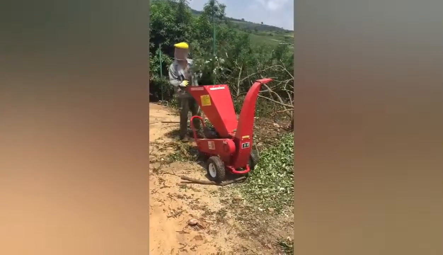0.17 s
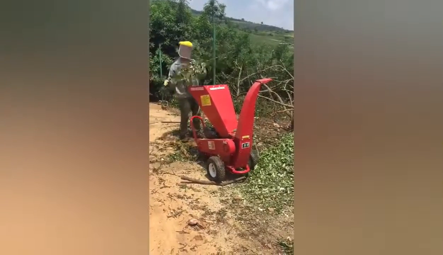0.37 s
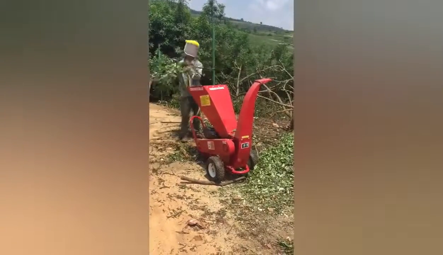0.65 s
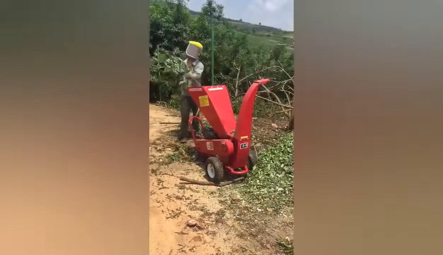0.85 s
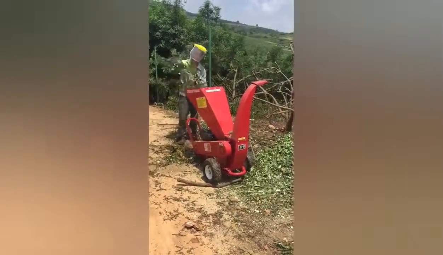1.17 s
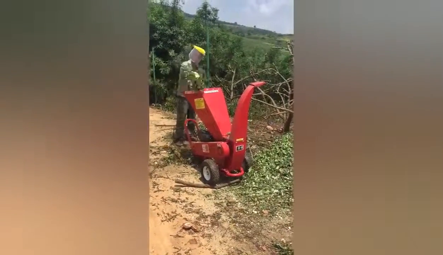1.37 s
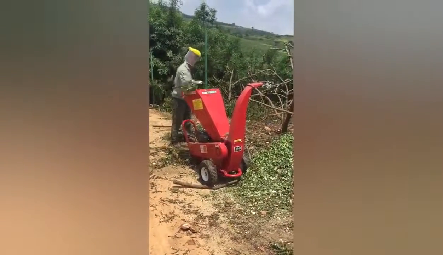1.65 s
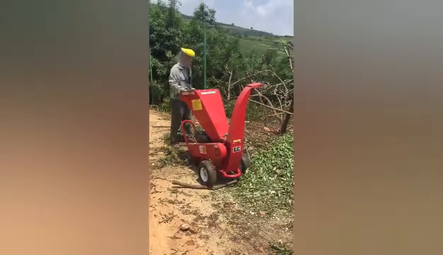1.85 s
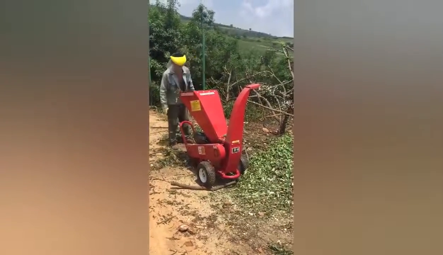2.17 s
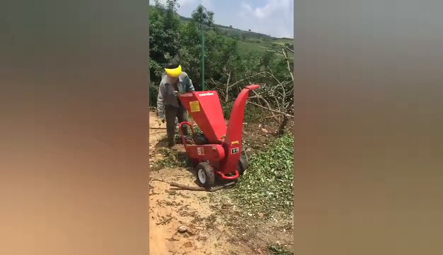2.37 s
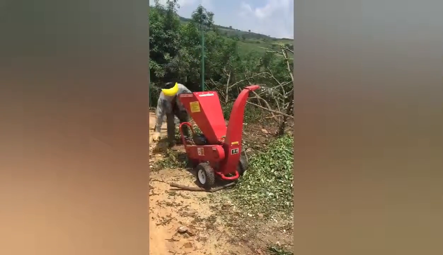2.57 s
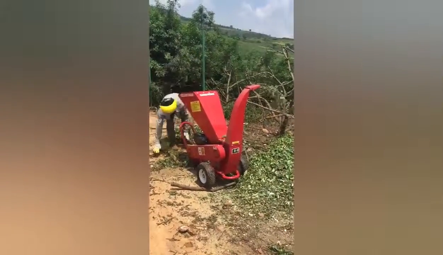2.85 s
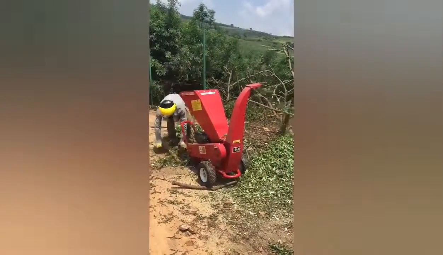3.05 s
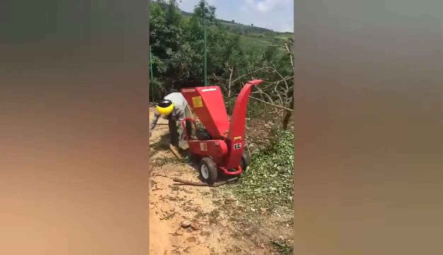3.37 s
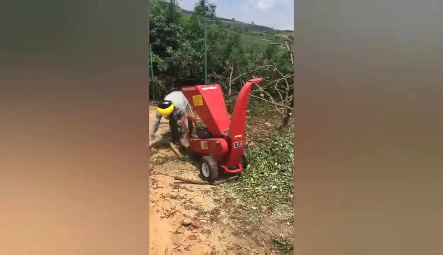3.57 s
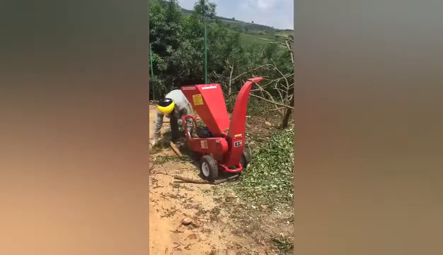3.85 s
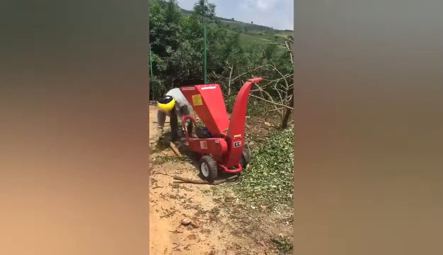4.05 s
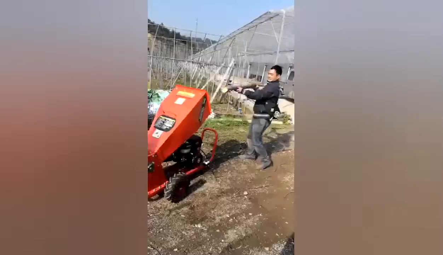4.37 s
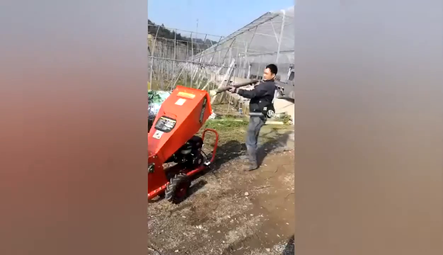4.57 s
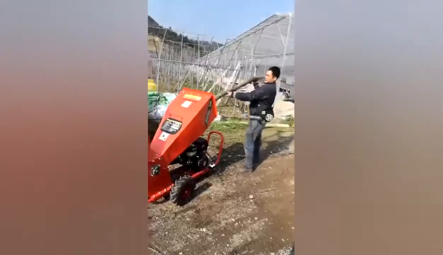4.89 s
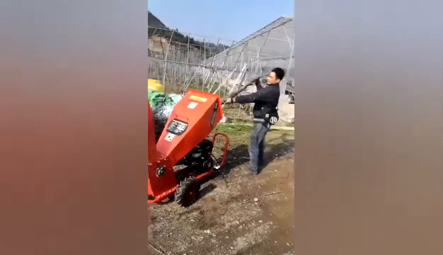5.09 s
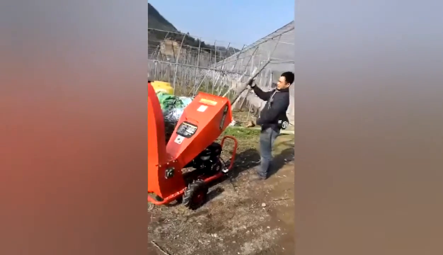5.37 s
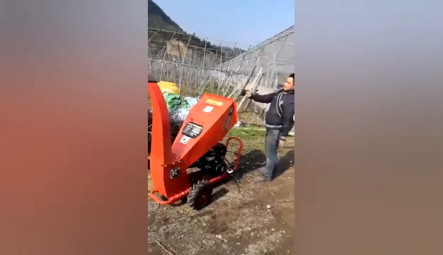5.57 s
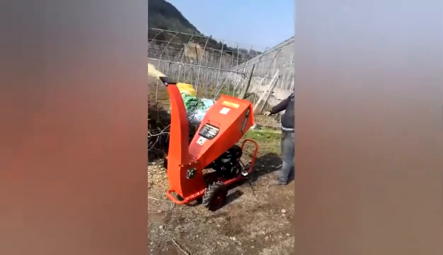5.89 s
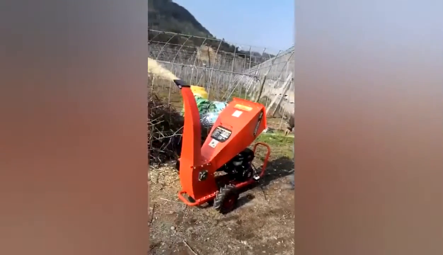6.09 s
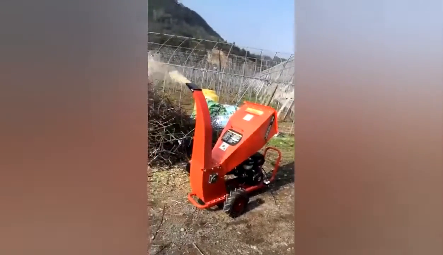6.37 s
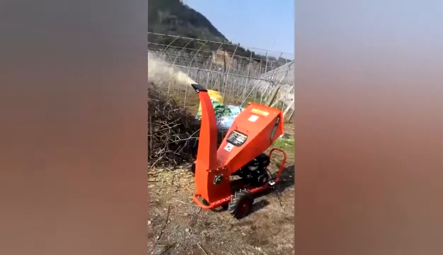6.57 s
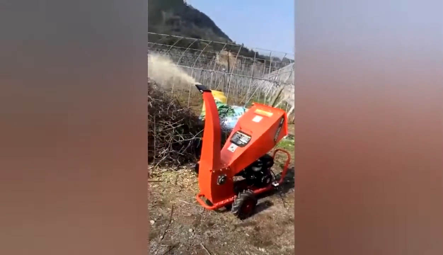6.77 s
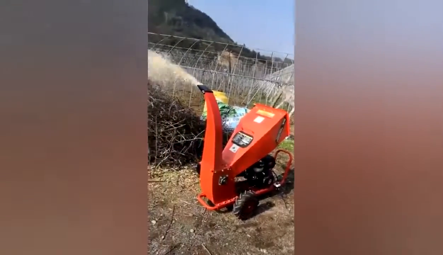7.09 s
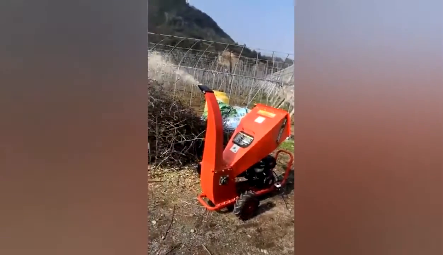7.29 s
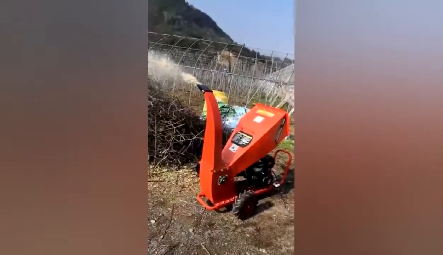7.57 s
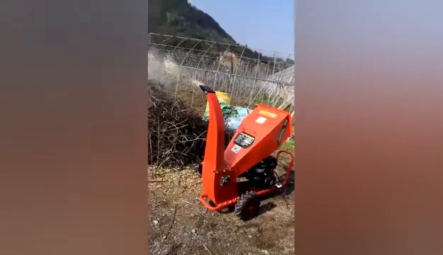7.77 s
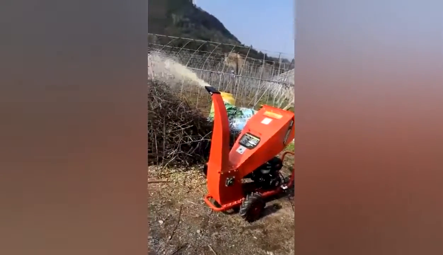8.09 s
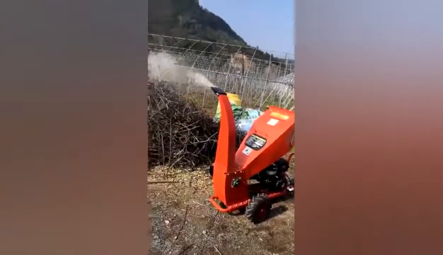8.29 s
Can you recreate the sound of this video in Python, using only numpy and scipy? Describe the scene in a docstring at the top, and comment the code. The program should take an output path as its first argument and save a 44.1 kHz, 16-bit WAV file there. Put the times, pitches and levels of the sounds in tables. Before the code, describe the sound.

Outdoors, a small engine-driven chipper drones quietly at a distance with a loose metal tick and faint leaf rustles. A leafy branch goes in with a crunchy hiss, snaps and a hopper knock, and the engine sags, then recovers. After a brief near-silent gap, a second chipper starts abruptly, close and much louder, clattering steadily before a thick pole makes it drop in pitch, hammer, groan and crack while chips pelt the steel chute.

```python
"""A far wood chipper drones and ticks while a leafy branch hisses through it; after near silence a second,
close and loud, growls and drops in pitch as a thick pole is hammered, groans and cracks into chips.
Engines are wavering multiples of the firing rate, with rattle noise coloured by housings and steel sheets.
Leaves, splinters and chips are showers of tiny impacts, shaped by the feed, the knife strokes and the chute.
Knocks, ticks and hopper blows are impulses or noise bursts through resonances; groans are gliding tones."""
import sys
import numpy as np
from scipy import signal
from scipy.fft import rfft, irfft, next_fast_len
from scipy.io import wavfile
from scipy.ndimage import uniform_filter1d, map_coordinates

SR = 44100
rng = np.random.default_rng(int(sys.argv[2]) if len(sys.argv) > 2 else 0)


def log_audio(samples):
    """Write samples as a 16-bit WAV file to the path given in sys.argv[1]."""
    # one column per channel
    frames = np.atleast_2d(samples).T
    # limit to full scale, then quantise
    limited = np.clip(frames, -1, 1)
    pcm = np.round(limited * 32767).astype(np.int16)
    wavfile.write(sys.argv[1], SR, pcm)


N = 372204
T = np.arange(N) / SR   # seconds

FIRST_STOP_S, SECOND_START_S = 4.341, 4.6465
CUTOFF_HZ = 16000

# Near engine speed. Each row: time in seconds, firings per second.
NEAR_SPEED = [(4.65, 30.05), (5.76, 30.15), (6.0, 26.7), (6.13, 25.4), (6.6, 26.0), (6.87, 26.4),
              (7.12, 25.8), (7.35, 26.2), (7.6, 27.0), (7.85, 28.0), (8.1, 28.4), (8.44, 29.4)]
# Load on the near knives; the first value also holds before the first row. Each row: time in seconds, load 0-1.
NEAR_LOAD = [(5.74, 0.4), (5.84, 0.55), (6.15, 0.6), (7.2, 0.76), (7.8, 0.58), (8.44, 0.81)]
# Near exhaust at zero load. Each row: multiple of the firing rate, relative level in dB.
NEAR_ORDERS = [(2, -18), (3, -5.5), (4, 0.5), (5, 0), (6, -1), (7, -3.5), (8, -1.5), (9, -12), (10, -21),
               (11, -18), (13, -15.5), (20, -43), (26, -33), (30, -16), (34, -6), (38, -17)]
# Near exhaust, throttle wide open. Each row: multiple of the firing rate, relative level in dB.
NEAR_LABOURING_ORDERS = [(2, -21.5), (3, -32), (4, -10), (5, -11.5), (6, -2.5), (7, -2), (8, -6), (9, -1),
                         (10, -2.5)]
NEAR_EXHAUST_DB, NEAR_EXHAUST_LOAD_DB = -24, -7   # at zero load; change at full load
# Rotor whine at zero load. Each row: multiple of the knife rate, level in dB.
ROTOR_ORDERS = [(1, -34.5), (2, -28.5), (4, -30.5), (5, -34.5)]
KNIVES_PER_FIRING = 3.393
# Knife growl. Each row: multiple of the knife rate, relative level in dB.
GROWL_ORDERS = [(3, -4), (4, -4), (5, -12), (6, -19)]
# growl before the load scales it; added by a full bite; change per firing per s lost
GROWL_DB, GROWL_BITE_DB, GROWL_SAG_DB = -23.5, 12, -0.7
# Near engine block and housing. Each row: frequency in Hz, relative level in dB per Hz.
NEAR_RUMBLE = [(25, -29), (60, -20), (110, -2), (200, -8), (310, -7.5), (400, -5.5), (520, -15.5),
               (800, -16.5)]
# Low rumble over time. Each row: time in seconds, level in dB.
NEAR_RUMBLE_LEVEL = [(4.65, -24), (5.2, -31.5), (5.8, -32), (6.3, -36.5), (6.6, -22), (7.3, -21.5),
                     (7.95, -25.5), (8.44, -25.5)]

# The knives bite deep into the pole. Each row: start in seconds, length in seconds, depth 0-1, splintering 0-1.
BITES = [(5.804, 0.1, 0.54, 0.66), (5.997, 0.046, 0.6, 0.4), (6.036, 0.094, 0.55, 0.5),
         (6.142, 0.11, 0.83, 0.36), (6.386, 0.027, 1, 0.7), (6.575, 0.034, 0.5, 0), (6.66, 0.031, 0.6, 0.4),
         (6.796, 0.069, 0.49, 0.6), (6.877, 0.11, 0.4, 0.32), (7.131, 0.054, 0.64, 0.15),
         (7.286, 0.028, 0.78, 0.57), (7.369, 0.023, 0.79, 0.2), (7.472, 0.035, 0.96, 0.15),
         (7.522, 0.052, 1, 0.99), (7.628, 0.03, 0.63, 0.96), (7.74, 0.038, 0.9, 1.0),
         (7.801, 0.04, 0.2, 0.64), (7.877, 0.18, 0.3, 0.47), (8.02, 0.062, 0.43, 0.8),
         (8.219, 0.045, 0.69, 0.32), (8.109, 0.039, 0.12, 0.2), (8.348, 0.028, 0.59, 0.68),
         (8.407, 0.033, 0.39, 0.98)]
BITE_ATTACK_S, BITE_RELEASE_S = 0.02, 0.022
# Hopper resonances. Each row: frequency in Hz, width in Hz, relative level in dB.
HOPPER = [(129.5, 20, -14), (229, 5, 7), (263, 7.6, 1), (310, 28, 6), (384, 18.5, 4.5), (410.6, 11.5, 8.5),
          (452.3, 12, 2.5), (514, 15, 2)]
HAMMER_DB, HAMMER_BITE_DB = -22, 3   # before the load scales it; added by a full bite
BOUNCES_PER_S, BOUNCE_DB = 16, 1   # small random bounces of the pole; spread at full load
# Near clatter. Each row: frequency in Hz, relative level in dB per Hz.
NEAR_CLATTER = [(350, -18), (600, -10.5), (800, 0.5), (1300, 1.5), (1650, 3), (1950, 4.5), (2320, -0.5),
                (2720, 2.5), (3000, -4), (3700, -7), (4400, -15.5), (6000, -16), (8000, -76)]
NEAR_CLATTER_DB, NEAR_CLATTER_BITE_DB = -18.5, 1.25   # between bites; added by full splintering
# Ringing steel sheets. Each row: frequency in Hz, width in Hz, relative level in dB.
NEAR_PANELS = [(769.6, 7.1, 10.5), (1159, 5.8, 9), (1543, 2, -7), (1995, 12, 3.5), (2415, 14, 9),
               (2607, 39, 2), (2702, 55, 2)]
PANEL_RING_DB, PANEL_LOAD_DB = -0.5, -2.5   # at zero load; the wood damps the ring at full load
SHEET_FLEX_S = 0.00018   # the load flexes the sheets, so their ring wavers in pitch
# Chips against the chute. Each row: frequency in Hz, relative level in dB per Hz.
CHUTE = [(2500, -1), (4500, -3.5), (5700, -7), (6900, -6), (8500, -1), (9500, 6.5), (10000, 1.5),
         (10800, -1.5), (11600, -13), (13600, -20.5), (14200, -22), (15300, -30)]
SPRAY_DB, SPRAY_LOAD_DB, SPRAY_BITE_DB = -35.5, 8, 3   # zero load; added at full load; by full splintering
PUFF_DEPTH, PUFF_DELAY = 0.35, 0.41   # chip puff per power stroke at full load; delay as share of the cycle
FIRST_CHIPS_S, FIRST_CHIPS_LENGTH_S, FIRST_CHIPS_DB = 5.77, 0.38, -30   # the pole's tip goes up in one gush
# The cutting din dips briefly. Each row: start in seconds, length in seconds, depth in dB.
DIPS = [(4.79, 0.095, 1), (5.61, 0.16, 1), (6.31, 0.04, 1.5), (6.75, 0.037, 1), (7.05, 0.081, 1),
        (7.593, 0.035, 2.5), (7.68, 0.053, 1.5), (8.17, 0.073, 2.5), (8.27, 0.019, 2.5)]
DIP_EDGE_S = 0.0033
# Tearing wood. Each row: frequency in Hz, relative level in dB per Hz.
TEARING = [(500, -25), (900, 1.5), (1500, 1.5), (2100, 3.5), (2900, -2.5), (3700, -6), (4600, -17),
           (7000, -24.5), (9500, -19.5), (12000, -27)]
TEARING_DB = -25.5   # at full splintering
# Chunks split off the pole. Each row: time in seconds, strength in dB before CRACK_DB.
CRACKS = [(5.847, -13), (6.093, -8), (6.236, -6), (6.3995, -14), (6.5415, -11), (6.6321, -9), (6.9546, -11),
          (6.992, -7), (7.2945, -11), (7.4759, -9), (7.5483, -11), (7.638, -18), (7.6614, -14), (7.762, -5),
          (7.7796, -16), (8.0554, -17), (8.1404, -13), (8.2322, -14), (8.4267, -9)]
CRACK_DB, CRACK_DECAY_S = -8, 0.008
# The pole groans on the knives. Each row: start in seconds, length in seconds, first Hz, last Hz, level in dB.
GROANS = [(5.805, 0.049, 319, 298, -13.5), (5.854, 0.079, 285.4, 279.4, -16.5),
          (5.951, 0.028, 297, 308, -19), (6.032, 0.032, 324, 330.8, -23), (6.093, 0.033, 329, 334, -23),
          (6.136, 0.04, 320, 339.7, -16.5), (6.183, 0.089, 338.4, 328.8, -19.5),
          (6.387, 0.05, 310, 325, -20.5), (6.472, 0.037, 336.7, 328, -22), (6.585, 0.027, 312, 315, -22),
          (6.65, 0.031, 330, 323.2, -17.5), (6.759, 0.092, 279, 271.4, -23), (6.89, 0.14, 312.7, 303, -18),
          (7.096, 0.082, 321.5, 327.3, -23), (7.22, 0.06, 280, 270.7, -22),
          (7.317, 0.046, 275.3, 271.5, -25), (7.389, 0.028, 284, 288.3, -25),
          (7.456, 0.038, 287, 302.3, -15), (7.542, 0.085, 305, 290, -20),
          (7.724, 0.035, 297.7, 297.5, -14.5), (7.807, 0.033, 305, 302.5, -21),
          (7.885, 0.096, 296.6, 289, -19), (7.996, 0.089, 296, 299.6, -13.5),
          (8.129, 0.054, 292.5, 311.7, -14.5), (8.228, 0.082, 308.2, 290.5, -14.5),
          (8.337, 0.066, 308.3, 296, -14.5)]
GROAN_ATTACK_S, GROAN_RELEASE_S = 0.021, 0.0087
GROAN_CHOP = 0.49   # how far each knife stroke shakes the note
GROAN_HELD_DB = -25.5   # the groan never falls below this between surges, before the chop
# Dull thumps on the hopper wall. Each row: start in seconds, length in seconds, pitch in Hz, level in dB.
THUMPS = [(5.12, 0.083, 208, -23), (5.753, 0.04, 144.6, -19), (6.562, 0.064, 135, -23),
          (6.969, 0.093, 126.4, -22.5), (7.261, 0.079, 113.1, -22.5), (7.62, 0.047, 125.3, -27)]

# Far engine speed. Each row: time in seconds, firings per second.
FAR_SPEED = [(0, 25.5), (0.95, 25.52), (1.45, 25.78), (1.98, 25.1), (2.83, 24.0), (3.43, 24.5),
             (4.05, 25.3)]
# free firing rate; the drop at which the governor has the throttle wide open
FAR_FREE_PER_S, FAR_FULL_SAG_PER_S = 25.6, 1.15
# Load on the far knives; the end values hold outside the rows. Each row: time in seconds, load 0-1.
FAR_LOAD = [(1.45, 0.76), (1.56, 0.56), (2.2, 0.72), (2.65, 1.0), (3.1, 0.8), (3.3, 0.06)]
# Far exhaust running free. Each row: multiple of the firing rate, relative level in dB.
FAR_ORDERS = [(2, -25), (3, -16.5), (4, 0), (5, -0.5), (6, -20), (7, -4.5), (8, -12), (9, -9), (10, -17),
              (11, -10.5), (12, -6.5), (13, -5.5), (14, -17), (15, -9), (16, -18)]
# Far exhaust, throttle wide open. Each row: multiple of the firing rate, relative level in dB.
FAR_LABOURING_ORDERS = [(3, -18), (4, -4), (5, -17), (6, -8.5), (8, -13), (9, -3.5), (10, -8), (13, -23),
                        (14, -8)]
FAR_EXHAUST_DB = -39
# Far housing and engine block. Each row: frequency in Hz, relative level in dB per Hz.
FAR_RUMBLE = [(25, -21.5), (60, -13), (110, 0), (165, -2), (212, 2), (260, 1.5), (340, 2.5), (400, 0.5),
              (450, -6.5), (700, -24)]
# Booms of the far housing. Each row: frequency in Hz, width in Hz, relative level in dB.
FAR_HOUSING = [(298, 8.6, -2), (335.3, 5.6, 7), (389, 19, -2.5)]
FAR_RUMBLE_DB, FAR_RUMBLE_THROTTLE_DB = -38.5, 3   # running free; added at full throttle
# Far clatter. Each row: frequency in Hz, relative level in dB per Hz.
FAR_CLATTER = [(300, -35.5), (500, -3), (700, 1.5), (850, 3.5), (1200, -3), (1600, -3), (2000, -5.5),
               (2300, -13.5), (3000, -15), (4400, -18), (5500, -27.5), (8000, -33), (10500, -36),
               (11800, -42.5), (13000, -67.5)]
# Ringing covers of the far machine. Each row: frequency in Hz, width in Hz, relative level in dB.
FAR_PANELS = [(506, 20, 5), (982, 48, 6), (1174, 16, -5.5), (1407, 8.9, 0), (1930, 8.6, 4), (2526, 75, 2)]
# zero load at the start; added at full load; slow rise per second
FAR_CLATTER_DB, FAR_CLATTER_LOAD_DB, FAR_CLATTER_DB_PER_S = -42.5, 5, 0.65
# Hard strikes of a loose steel part. Each row: time in seconds, strength in dB.
TICKS = [(0.1426, -34), (0.1825, -36), (0.2603, -34), (0.3391, -40), (0.4179, -37), (0.4958, -35),
         (0.5746, -34), (0.6135, -39), (0.6529, -41), (0.7312, -33), (0.7696, -38), (0.8091, -35),
         (0.848, -40), (0.9273, -39), (0.9652, -34), (1.0046, -38), (1.2386, -33.5), (1.3164, -35),
         (1.3942, -38), (1.7459, -45), (1.9041, -42), (1.9839, -31), (3.8217, -36), (3.9015, -35),
         (4.139, -32)]
# Ring of that part. Each row: frequency in Hz, width in Hz, relative level in dB.
TICK_MODES = [(2750, 260, -15), (3320, 100, -7.5), (3370, 120, -6), (3970, 300, -24)]
# soft chatter before its resonance: at the start; change at full throttle; slow fade per second
TICK_DB, TICK_THROTTLE_DB, TICK_DB_PER_S = -43, -4, -0.3
TICK_REBOUND_S, TICK_REBOUND_DB = 0.011, -9   # nominal delay; level against the strike
TICK_BUZZ_DB, TICK_BUZZ_DECAY_S = -15, 0.018   # it buzzes on its seat after a hard strike
# Leafy sprigs drawn into the knives. Each row: start in seconds, length in seconds, level in dB.
SPRIGS = [(1.443, 0.1, -47), (1.507, 0.11, -44.5), (1.63, 0.47, -48.5), (2.098, 0.07, -47),
          (2.186, 0.069, -44.5), (2.313, 0.068, -42.5), (2.435, 0.28, -49.5), (2.803, 0.12, -52.5),
          (2.88, 0.21, -56)]
SPRIG_ATTACK_S, SPRIG_RELEASE_S = 0.08, 0.05
# Shredded leaves. Each row: frequency in Hz, relative level in dB per Hz.
LEAF_HISS = [(900, 13), (1900, 6), (2600, 7.5), (4000, 6.5), (6000, 2.5), (9500, -3.5), (11500, -8.5),
             (12500, -32), (15000, -58)]
CRACKLE_DB = -5   # twigs among the leaves, against the hiss
CRUNCH_DB, CRUNCH_HZ, CRUNCH_WIDTH_HZ = -13, 2900, 1350   # thin twigs crushed, against the hiss
# Twigs snapping. Each row: time in seconds, strength in dB before a 3 dB cut.
SNAPS = [(1.5894, -48), (1.6794, -37.5), (2.366, -36), (2.4294, -41.5), (2.6894, -49), (2.9986, -40),
         (3.1423, -39.5)]
# The knives chew the woody stem. Each row: start in seconds, length in seconds, level in dB.
CHEWS = [(1.628, 0.09, -45.5), (1.767, 0.06, -49), (1.98, 0.07, -44.5), (2.14, 0.089, -43.5),
         (2.23, 0.04, -46), (2.33, 0.07, -49), (2.438, 0.047, -44), (2.53, 0.1, -46), (2.64, 0.06, -41.5),
         (2.73, 0.13, -49), (2.864, 0.055, -40.5), (3.02, 0.078, -45)]
CHEW_ATTACK_S, CHEW_RELEASE_S = 0.02, 0.042
STEM_HZ, STEM_WIDTH_HZ = 1930, 500   # the rasp of the woody stem
# The branch knocks on the feed hopper. Each row: time in seconds, strength in dB.
KNOCKS = [(1.57, -35), (2.64, -37), (3.11, -30)]
KNOCK_HZ, KNOCK_WIDTH_HZ, KNOCK_DECAY_S = 201.4, 10, 0.074
# Leaves brush as the branch is lifted. Each row: start in seconds, length in seconds, level in dB.
RUSTLES = [(0.109, 0.043, -59), (0.258, 0.04, -67), (0.554, 0.045, -55), (0.728, 0.03, -59),
           (0.963, 0.03, -58), (1.126, 0.049, -60), (1.225, 0.03, -57)]
# Colour of the rustle. Each row: frequency in Hz, relative level in dB per Hz.
RUSTLE = [(2500, -4), (4500, 4), (7000, -4), (10500, -13), (12500, -47)]


def near_engine(turn, load, bite):
    """Exhaust and belt-driven rotor sing; with load the exhaust hardens and the knives growl."""
    throttle = np.clip((load - .21) / .36, 0, 1)   # wide open well before full load
    cut_jerks = .02 * throttle * load * drift(30)   # each cut jerks the crank
    firing = turn + cut_jerks + .002 * drift(20)
    orders = hardening(NEAR_ORDERS, NEAR_LABOURING_ORDERS, throttle)
    exhaust = from_db(NEAR_EXHAUST_DB + NEAR_EXHAUST_LOAD_DB * load) * hum(firing, orders, waver_db=1.6)
    knife_turn = turn * KNIVES_PER_FIRING
    rotor = from_db(-14 * load) * hum(knife_turn, ROTOR_ORDERS, waver_db=3.5)
    stumble = .035 * drift(35)   # the wood gives way unevenly
    speed, = in_time(NEAR_SPEED)
    growl_db = GROWL_DB + GROWL_BITE_DB * bite + GROWL_SAG_DB * (speed[0] - speed)
    growl = load * from_db(growl_db) * hum(knife_turn + stumble, GROWL_ORDERS, waver_db=-3.0)
    body = coloured(rattle(turn, repeat=.1, throb=.35), NEAR_RUMBLE)
    rumble = from_db(in_time(NEAR_RUMBLE_LEVEL)[0]) * body
    return exhaust + rotor + growl + rumble


def near_hammering(cuts, load, bite, bounce_db):
    """Each knife stroke thumps the hopper, whose walls resonate; load and bite set the strength."""
    impacts = rms_one(np.diff(cuts, prepend=0))
    tearing = 1.94 * cuts * rng.standard_normal(N)
    band = signal.butter(2, [115, 620], "band", fs=SR, output="sos")
    hopper = signal.sosfilt(band, ringing(impacts + tearing, HOPPER))
    hopper = hopper / np.sqrt(uniform_filter1d(hopper ** 2, size=2600) + 1e-12)   # even out its own swells
    return np.sqrt(load) * from_db(HAMMER_DB + HAMMER_BITE_DB * bite + bounce_db) * hopper


def near_clatter(turn, cuts, load, splintering, power):
    """Engine rattle mixed with splintering wood excites the steel sheets, damped by the load."""
    wood = np.clip(0.31 * load, 0, 1)   # share of splintering in the din
    splinters = rms_one(cuts * grains(per_s=5000, spread_db=5.0))
    machine = rattle(turn, repeat=0.14, throb=0.094)
    din = coloured(np.sqrt(1 - wood) * machine + np.sqrt(wood) * splinters, NEAR_CLATTER)
    flexed = T + SHEET_FLEX_S * load * drift(12)
    ring = np.interp(flexed, T, ringing(din, NEAR_PANELS))
    sheets = from_db(PANEL_RING_DB + PANEL_LOAD_DB * load) * ring
    level = from_db(NEAR_CLATTER_DB + NEAR_CLATTER_BITE_DB * splintering)
    return level * (1 + 0.1 * power) * rms_one(din + sheets)


def near_spray(cuts, load, splintering, power, bounce_db):
    """Chips pelt the steel chute, pulsed by knife strokes and by a puff at each power stroke."""
    pulses = (1 + PUFF_DEPTH * power) * (1 + 0.5 * load * (cuts - 1))
    chips = pulses * grains(per_s=11000, spread_db=-4.5)
    first_chips = [(FIRST_CHIPS_S, FIRST_CHIPS_LENGTH_S, from_db(FIRST_CHIPS_DB))]
    gush = swells(first_chips, BITE_ATTACK_S, release_s=0.068)
    flow_db = SPRAY_DB + SPRAY_LOAD_DB * load + SPRAY_BITE_DB * splintering + 0.16 * bounce_db
    return np.hypot(gush, from_db(flow_db)) * coloured(chips, CHUTE)


def near_cutting(turn, load, bite, splintering):
    """Shared knife and power strokes drive hammering, clatter and spray, which dip briefly together."""
    cuts = strokes(turn * KNIVES_PER_FIRING, decay=1.0, uneven_db=2.5)
    power = load * (strokes(turn - PUFF_DELAY, decay=0.4, uneven_db=1.5) - 1)
    bounce_db = BOUNCE_DB * load * drift(BOUNCES_PER_S)
    hammering = near_hammering(cuts, load, bite, bounce_db)
    clatter = near_clatter(turn, cuts, load, splintering, power)
    spray = near_spray(cuts, load, splintering, power, bounce_db)
    dips = from_db(-swells(DIPS, DIP_EDGE_S, DIP_EDGE_S))
    return dips * (hammering + clatter + spray)


def near_splitting(turn, splintering):
    """Fibres tear at every stroke of a splintering bite, and chunks split off with a crack."""
    cuts = strokes(turn * KNIVES_PER_FIRING, decay=.45, uneven_db=2.5)
    tearing = from_db(TEARING_DB) * splintering * cuts
    cracking = from_db(CRACK_DB) * bursts(CRACKS, CRACK_DECAY_S)
    return (tearing + cracking) * coloured(grains(per_s=6000, spread_db=1.5), TEARING)


def near_pole(turn):
    """The pole chatters on the knives in a surging, gliding groan, and dull thumps hit the hopper wall."""
    stumble = .04 * drift(70)   # the pole gives way unevenly
    chop = 1 + GROAN_CHOP * (strokes(turn * KNIVES_PER_FIRING, decay=0.98, uneven_db=3.0) - 1)
    pitch = np.zeros(N)
    for s, length, from_hz, to_hz, _ in GROANS:
        pitch = np.where(T < s, pitch, np.interp(T, [s, s + length], [from_hz, to_hz]))
    surge_events = [(s, length, from_db(db)) for s, length, _, _, db in GROANS]
    surges = swells(surge_events, GROAN_ATTACK_S, GROAN_RELEASE_S)
    held = from_db(GROAN_HELD_DB) * np.clip((T - GROANS[0][0]) / GROAN_ATTACK_S, 0, 1)
    tone = np.sin(2 * np.pi * (np.cumsum(pitch) / SR + stumble))
    groan = np.sqrt(2) * np.maximum(surges, held) * tone
    thumps = sum(note(s, length, hz, db, 2 * stumble) for s, length, hz, db in THUMPS)
    return chop * groan + thumps


def far_engine(turn, load, throttle):
    """Exhaust drone hardens as the throttle opens; the housing rumbles and clatter rings in the covers."""
    firing = turn - .73 + .0035 * drift(30)   # the exhaust opens late in the cycle, never quite on time
    orders = hardening(FAR_ORDERS, FAR_LABOURING_ORDERS, throttle)
    exhaust = from_db(FAR_EXHAUST_DB) * hum(firing, orders, waver_db=2.0, aligned_order=4.3)
    housing = coloured(rattle(turn, repeat=.15, throb=.2), FAR_RUMBLE)
    rumble_db = FAR_RUMBLE_DB + FAR_RUMBLE_THROTTLE_DB * throttle
    rumble = from_db(rumble_db) * rms_one(housing + ringing(housing, FAR_HOUSING))
    block = coloured(rattle(turn, repeat=.3, throb=.22), FAR_CLATTER)
    clatter_db = FAR_CLATTER_DB + FAR_CLATTER_LOAD_DB * load + FAR_CLATTER_DB_PER_S * T
    clatter = from_db(clatter_db) * rms_one(block + ringing(block, FAR_PANELS))
    return exhaust + rumble + clatter


def far_ticks(turn, throttle):
    """A loose steel part chatters softly once a cycle; now and then it strikes hard, rebounds and buzzes."""
    delay = .65 + .015 * drift(25)   # share of the cycle after which the part touches
    taps = strokes(turn - delay, decay=.1, uneven_db=1.3)
    strength = from_db(TICK_DB + TICK_THROTTLE_DB * throttle + TICK_DB_PER_S * T)
    chatter = resonance(strength * taps * rng.choice([-1, 1], N), hz=3360, width_hz=600)
    rebounds = [(s + TICK_REBOUND_S * rng.uniform(.7, 1.4), db + TICK_REBOUND_DB) for s, db in TICKS]
    strikes = clicks(TICKS) + clicks(rebounds)
    ring = np.zeros(N)
    for hz, width, db in TICK_MODES:
        peak_gain = SR / (2 * np.pi * width)   # makes an impulse ring at about its own height
        ring += from_db(db) * peak_gain * resonance(strikes, hz, width)
    seat = rms_one(resonance(rng.standard_normal(N), hz=3500, width_hz=1300))
    buzz = from_db(TICK_BUZZ_DB) * bursts(TICKS, TICK_BUZZ_DECAY_S) * seat
    dulling = signal.butter(3, 5500, fs=SR, output="sos")   # distance dulls the edge
    return signal.sosfilt(dulling, chatter + ring + buzz)


def far_leaves(cuts):
    """Shredded leaves rasp in clumps and ring the covers while twigs crackle, crunch and snap."""
    clumps = from_db(1.3 * drift(40)) * (1 + 0.16 * (cuts + 1))
    feed = swells([(s, length, from_db(db)) for s, length, db in SPRIGS], SPRIG_ATTACK_S, SPRIG_RELEASE_S)
    crackle = from_db(CRACKLE_DB) * grains(per_s=250, spread_db=3)
    shreds = coloured(grains(per_s=5100, spread_db=1.0) + crackle, LEAF_HISS)
    hiss = feed * clumps * shreds
    twigs = resonance(cuts * grains(per_s=450, spread_db=2.5), CRUNCH_HZ, CRUNCH_WIDTH_HZ)
    crushed = rms_one(resonance(twigs, CRUNCH_HZ, CRUNCH_WIDTH_HZ))
    crunch = from_db(CRUNCH_DB) * feed * clumps * crushed
    snaps = from_db(-3) * bursts(SNAPS, decay_s=0.024) * coloured(rng.standard_normal(N), LEAF_HISS)
    return hiss + crunch + snaps + from_db(-5) * ringing(hiss, FAR_PANELS)


def far_stem(cuts):
    """The woody stem rasps as its fibres are cut, and the branch knocks a resonance of the hopper."""
    fibres = resonance(cuts * grains(per_s=3500, spread_db=1.0), STEM_HZ, width_hz=1500)
    chewing = swells([(s, length, from_db(db)) for s, length, db in CHEWS], CHEW_ATTACK_S, CHEW_RELEASE_S)
    rasp = chewing * rms_one(resonance(fibres, STEM_HZ, STEM_WIDTH_HZ))
    boom = rms_one(resonance(rng.standard_normal(N), KNOCK_HZ, KNOCK_WIDTH_HZ))
    return rasp + bursts(KNOCKS, KNOCK_DECAY_S) * boom


def far_rustle():
    """The leaves brush each other, in soft showers of tiny impacts, before the branch goes in."""
    events = [(s, length, from_db(db)) for s, length, db in RUSTLES]
    brushing = swells(events, attack_s=0.016, release_s=0.015)
    return brushing * coloured(grains(per_s=6000, spread_db=4.0), RUSTLE)


def noise_floor():
    """Very faint low noise under everything."""
    return from_db(-99) * coloured(rng.standard_normal(N), NEAR_RUMBLE)


def cycles(speed, wobble):
    """Engine cycles counted so far; the speed never holds quite still."""
    return np.cumsum(in_time(speed)[0] * (1 + wobble * drift(14))) / SR


def hum(turn, orders, waver_db, aligned_order=0):
    """Multiples of a rotation, each wavering in strength; those up to aligned_order start in phase."""
    lines = 0
    for multiple, db in orders:
        waver = np.interp(T, np.linspace(0, T[-1], num=100), rng.standard_normal(size=100))
        offset = rng.random() * (round(multiple) > aligned_order)
        lines = lines + from_db(db + waver_db * waver) * np.sin(2 * np.pi * (round(multiple) * turn + offset))
    return np.sqrt(2) * lines


def hardening(free, loaded, load):
    """Levels of the exhaust's lines, blended in power from free running to labouring."""
    power = {}
    for orders, share in ((free, 1 - load), (loaded, load)):
        for multiple, db in orders:
            power[round(multiple)] = power.get(round(multiple), 1e-12) + share * from_db(db) ** 2
    return [(multiple, 10 * np.log10(p)) for multiple, p in power.items()]


def strokes(turn, decay, uneven_db):
    """Envelope that jumps once a turn and dies within it; every stroke has its own strength."""
    strength = from_db(uneven_db * np.sqrt(3) * rng.uniform(-1.66, 1, size=2000))
    return rms_one(strength[turn.astype(int) % len(strength)] * np.exp(-(turn % 1) / decay))


def rattle(turn, repeat, throb):
    """Valve gear and piston slap: partly repeating each cycle, partly new, throbbing twice a cycle."""
    one_cycle = irfft(np.exp(2j * np.pi * rng.random(size=801)))
    again = rms_one(map_coordinates(one_cycle, [(turn % 1) * len(one_cycle)], order=3, mode="grid-wrap"))
    share = np.clip(repeat, 0, 1)
    beat = 1 + throb * (strokes(2 * turn, decay=1.0, uneven_db=6.0) - 1.0)
    return beat * (np.sqrt(share) * again + np.sqrt(1 - share) * rng.standard_normal(N))


def grains(per_s, spread_db):
    """Random tiny impacts of unequal size, either polarity; rms 1."""
    sizes = from_db(spread_db * np.minimum(rng.exponential(1, N), 4)) * rng.choice([-1, 1], N)
    return rms_one(sizes * (rng.random(N) < per_s / SR))


def clicks(events):
    """One impulse for each (s, dB)."""
    out = np.zeros(N)
    for s, db in events:
        out[int(s * SR)] += from_db(db)
    return out


def bursts(events, decay_s):
    """Envelope of sudden contacts that die away exponentially."""
    return signal.lfilter([1], [1, -np.exp(-1 / (decay_s * SR))], clicks(events) + 1e-18)


def swells(events, attack_s, release_s):
    """Attack, hold and release for each (start, length, height); the strongest one leads."""
    out = np.zeros(N)
    for s, length, height in events:
        rise = np.clip((T - s) / attack_s, 0, 1)
        fall = np.exp(-np.clip((T - s - length) / release_s, 0, 20))
        out = np.maximum(out, height * rise * fall)
    return out


def note(s, length, hz, db, stumble):
    """One short vibration, unsteady in phase."""
    envelope = swells([(s, length, from_db(db))], GROAN_ATTACK_S, GROAN_RELEASE_S)
    return np.sqrt(2) * envelope * np.sin(2 * np.pi * (hz * T + stumble))


def resonance(x, hz, width_hz):
    """Two-pole resonance with gain 1 on top."""
    r = np.exp(-np.pi * width_hz / SR)
    feedback = [1, -2 * r * np.cos(2 * np.pi * hz / SR), r * r]
    return signal.lfilter(np.array([1, 0, -1]) * (1 - r * r) / 2, feedback, x + 1e-18)


def ringing(x, modes):
    """A bank of parallel resonances."""
    return sum(from_db(db) * resonance(x, hz, width) for hz, width, db in modes)


def coloured(x, spectrum):
    """Pass a steady excitation through a body's response; rms 1."""
    hz, db = np.transpose(spectrum)
    size = next_fast_len(N)
    log_f = np.log(np.arange(size // 2 + 1) * SR / size + 1)
    outside = np.maximum(np.log(hz[0]) - log_f, 0) + np.maximum(log_f - np.log(hz[-1]), 0)
    response = from_db(np.interp(log_f, np.log(hz), db) - 20 * outside)   # falls off beyond both ends
    return rms_one(irfft(rfft(x, size) * response, size)[:N])


def drift(rate):
    """Smooth chance of rms 1 that changes rate times a second."""
    knots = rng.standard_normal(4000)
    return rms_one(map_coordinates(knots, [T * rate + 5], order=3, mode="wrap"))


def in_time(rows):
    """Each column of a curve at every sample."""
    s, *columns = np.transpose(rows)
    return [np.interp(T, s, c) for c in columns]


def from_db(db):
    """Decibels to gain."""
    return 10 ** (np.asarray(db) / 20)


def rms_one(x):
    """Scale to unit rms."""
    return x / np.sqrt(np.mean(x ** 2) + 1e-20)


def scene():
    """The far machine, a moment of near silence, then the near one."""
    near_turn = cycles(NEAR_SPEED, wobble=.002)
    load = np.clip(in_time(NEAR_LOAD)[0], 0, 1)
    bite = swells([(s, length, depth) for s, length, depth, _ in BITES], BITE_ATTACK_S, BITE_RELEASE_S)
    splinter_events = [(s, length, share) for s, length, _, share in BITES]
    splintering = swells(splinter_events, BITE_ATTACK_S, release_s=0.0081)
    near = near_engine(near_turn, load, bite) + near_cutting(near_turn, load, bite, splintering)
    near = near + near_splitting(near_turn, splintering) + near_pole(near_turn)

    far_turn = cycles(FAR_SPEED, wobble=.002)
    far_load = np.clip(in_time(FAR_LOAD)[0], 0, 1)
    throttle = np.clip((FAR_FREE_PER_S - in_time(FAR_SPEED)[0]) / FAR_FULL_SAG_PER_S, 0, 1)
    far_cuts = strokes(3 * far_turn, decay=0.8, uneven_db=2.2)
    far = far_engine(far_turn, far_load, throttle) + far_ticks(far_turn, throttle)
    far = far + far_leaves(far_cuts) + far_stem(far_cuts) + far_rustle()

    far_on = np.clip((FIRST_STOP_S - T) / .006, 0, 1)
    near_on = np.clip((T - SECOND_START_S) / .001, 0, 1)
    return (far * far_on + near * near_on + noise_floor())[None]


def record(dry):
    """Soft saturation rounds the highest peaks, and a steep low-pass cuts the top."""
    top = 1.3
    low_pass = signal.cheby2(12, 70, CUTOFF_HZ, fs=SR, output="sos")
    return signal.sosfilt(low_pass, top * np.tanh(dry / top))


dry = scene()
out = record(dry)
log_audio(out)
```